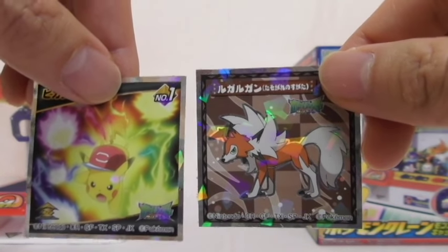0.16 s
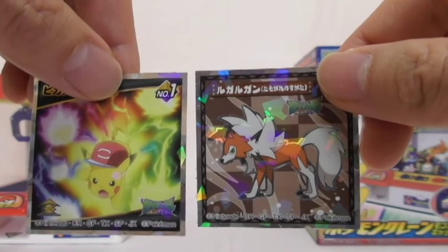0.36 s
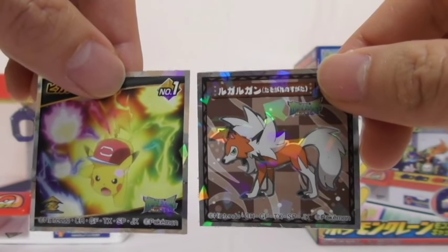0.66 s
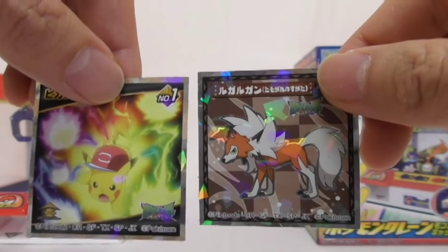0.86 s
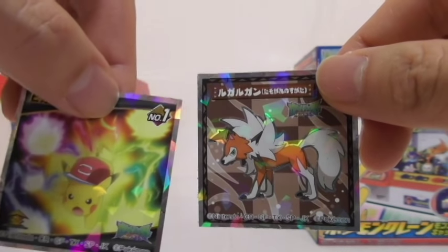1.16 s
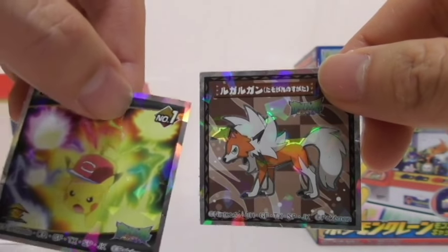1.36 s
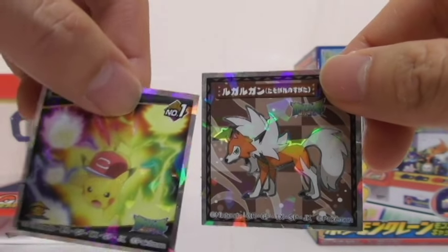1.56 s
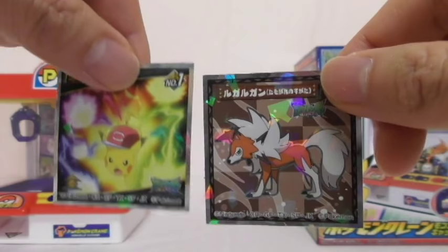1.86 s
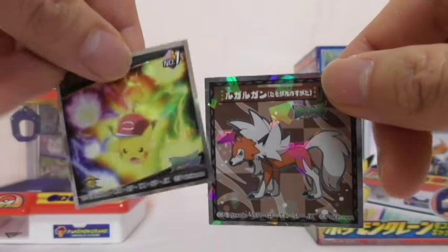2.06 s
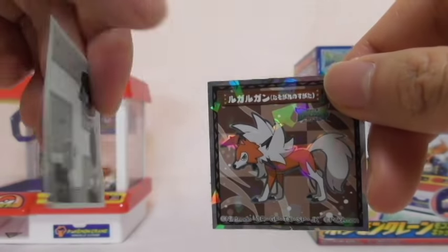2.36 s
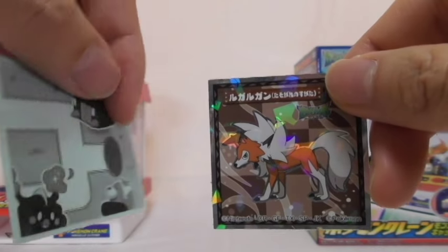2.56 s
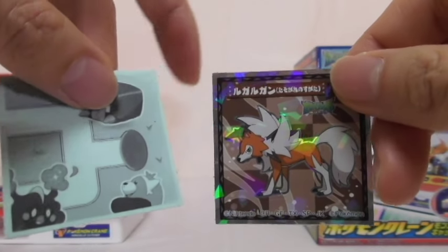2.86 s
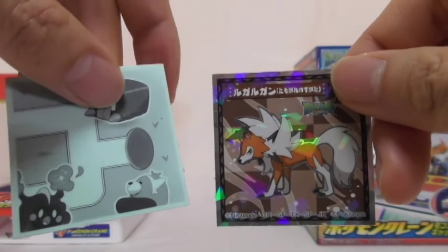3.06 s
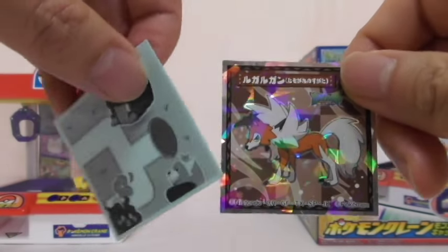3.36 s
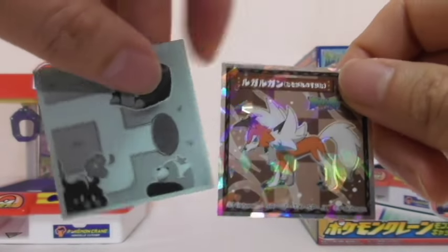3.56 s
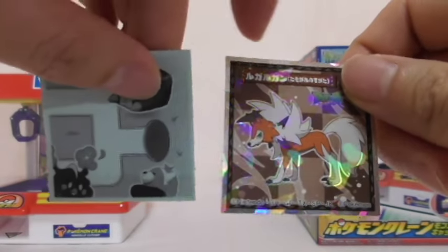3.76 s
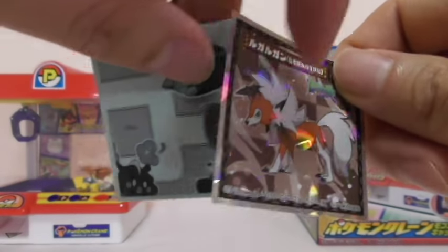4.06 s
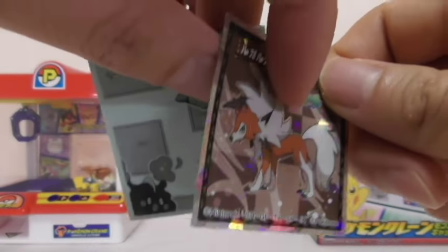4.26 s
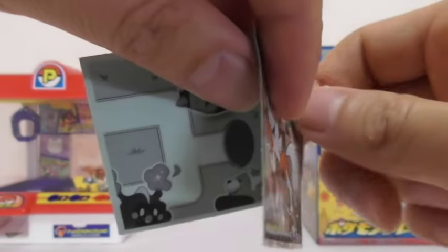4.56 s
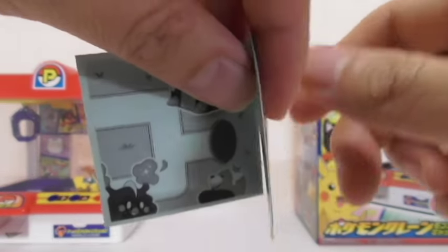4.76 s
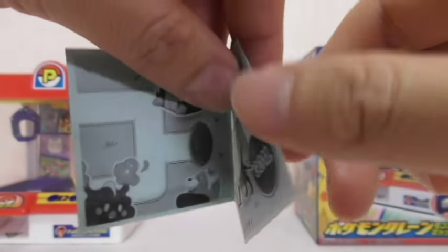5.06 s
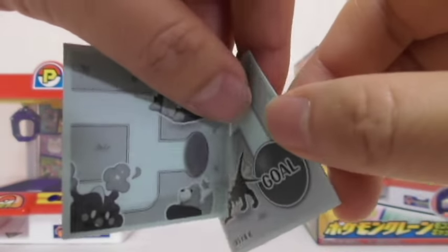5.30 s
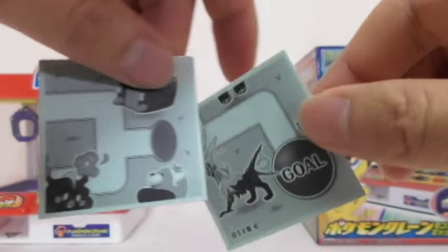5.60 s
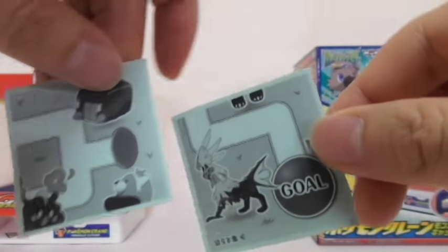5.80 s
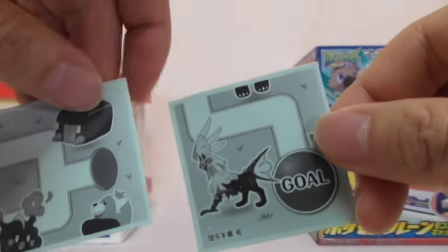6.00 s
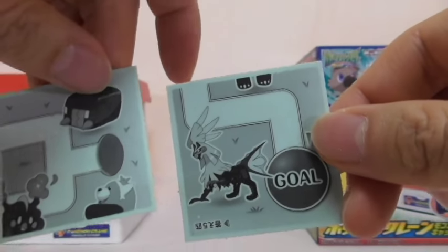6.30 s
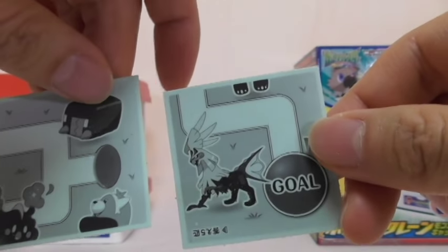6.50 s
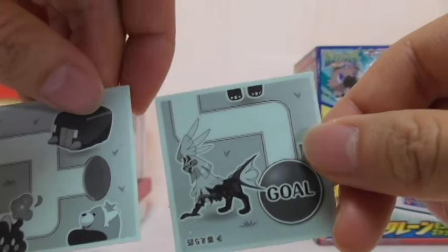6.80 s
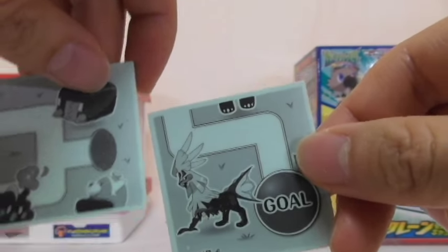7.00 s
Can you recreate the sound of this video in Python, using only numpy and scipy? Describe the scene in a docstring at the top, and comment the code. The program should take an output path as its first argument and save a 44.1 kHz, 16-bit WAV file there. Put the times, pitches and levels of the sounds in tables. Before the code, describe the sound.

In a quiet room, very close to a small stereo microphone, fingers handle two small stiff stickers. After over a second of near stillness, the first turns with short rubs, flicks and light thumps. The second follows with denser scraping and a loud crack around four seconds. Snaps thin out before six seconds, leaving faint hum, microphone hiss and the camera's tiny rapid focus ticking.

```python
"""Two stiff paper stickers are turned over between the fingers close to a small camera in a quiet room.
Skin slides on the paper in short hisses (dense clicks through a paper colour, with a ringing flutter),
edges flick free with snaps (short bursts of cracks), sheets buckle with low thumps (ringing modes).
The camera's focus drive ticks in spells (clicks ringing the lens barrel).
Low room noise and wavering hum tones lie under the hiss of the microphones (coloured noise)."""
import sys
import numpy as np
from scipy import signal
from scipy.fft import rfft, irfft
from scipy.io import wavfile

SR = 44100
rng = np.random.default_rng(int(sys.argv[2]) if len(sys.argv) > 2 else 0)


def digitize_waveform(pressure):
    """Quantize a signal to 16-bit integers and store it at the path in sys.argv[1].

    Rows of a 2-D input are taken as channels; values are limited to [-1, 1].
    """
    field = np.atleast_2d(pressure).T
    bounded = np.clip(field, -1, 1)
    quanta = np.round(bounded * 32767).astype(np.int16)
    wavfile.write(sys.argv[1], SR, quanta)


N = 314950


def from_db(db):
    """dB to gain."""
    return 10 ** (np.asarray(db) / 20)


def rms_one(x):
    """Scale to rms 1."""
    return x / np.sqrt(np.mean(x ** 2) + 1e-20)


def at_hz(points, hz):
    """Read a table on a log-frequency axis."""
    table_hz, values = np.array(points).T
    return np.interp(np.log(hz), np.log(table_hz), values)


def over_time(points, t_s):
    """Read a table on a time axis."""
    return np.interp(t_s, *np.transpose(points))


def drift(corner_hz):
    """Slow random curve of rms 1: noise through two equal poles, made at SR / 40."""
    r = np.exp(-2 * np.pi * corner_hz * 40 / SR)
    noise = rng.standard_normal(N // 40 + 2002)
    slow = signal.lfilter([1], [1, -2 * r, r * r], noise)[2000:]   # settled part
    return np.interp(np.arange(N) / 40, np.arange(len(slow)), rms_one(slow))


def ring(clicks, hz, t60_s):
    """Two-pole resonator: a unit click sets a sine of height 1 ringing."""
    r = from_db(-60 / (t60_s * SR))
    w = 2 * np.pi * hz / SR
    return signal.lfilter([0, np.sin(w)], [1, -2 * r * np.cos(w), r * r], clicks + 1e-18)


def pair(mid, side, likeness):
    """Left and right from a shared and an opposed part."""
    likeness = np.clip(likeness, -1, 1)
    return np.sqrt(1 + likeness) * mid + np.sqrt(1 - likeness) * side * [[1], [-1]]


# left-right likeness of steady noise: freq_hz, likeness [0-1]
NOISE_LIKENESS = [(60, 0.36), (450, 0.36), (1200, 0.69), (2000, 0.09), (3300, 1), (5500, 1), (9000, 0.68),
                  (15000, 0.17)]


def coloured(spectrum):
    """Steady stereo noise of rms 1, shaped by a spectrum table."""
    hz = np.maximum(np.fft.rfftfreq(N, 1 / SR), 1)
    mid, side = rfft(rng.standard_normal((2, N))) * from_db(at_hz(spectrum, hz))
    return rms_one(irfft(pair(mid, side, at_hz(NOISE_LIKENESS, hz)), N))


# microphone self-noise, relative density: freq_hz, density_db [dB per Hz]
MIC_HISS_SPECTRUM = [(1500, -9.5), (2100, -19.5), (2350, -28), (2800, -17.5), (4460, -15.5), (5000, -21.5),
                     (6500, -11), (7100, -10), (7700, -0.5), (8300, -5.5), (9470, -3.5), (11300, -5),
                     (14200, -4.5), (16000, -5)]
MIC_HISS_DB = -67.5


def mic_hiss():
    """Microphone self-noise: steady coloured noise."""
    return from_db(MIC_HISS_DB) * coloured(MIC_HISS_SPECTRUM)


# low room noise, relative density: freq_hz, density_db [dB per Hz]
AIR_SPECTRUM = [(15, -39), (25, -6.5), (45, -11.5), (65, -5), (130, -4), (230, -4), (366, -2), (490, -11.5),
                (720, -12.5), (1160, -21), (1450, -34.5), (1880, -70), (3190, -120)]
# mean level of the low room noise: time_s, level_db
AIR_LEVEL_DB = [(0, -57.5), (.7, -58), (1, -61), (2.998, -57.5), (7.14, -59)]


def air():
    """The room's low noise wanders in level, a little stronger on the right."""
    level_db = over_time(AIR_LEVEL_DB, np.arange(N) / SR) + 1.0 * drift(3.4)
    return from_db(level_db + [[-.6], [.6]]) * coloured(AIR_SPECTRUM)


# distant machines: pitch_hz, level_db, waver_hz
HUM_TONES = [(50, -76, 4), (98.5, -70, 3), (716, -73, 3), (840, -84, 2)]


def hum():
    """Steady tones whose level wavers; the left port leads by 0.8 rad."""
    t = np.arange(N) / SR
    lead_rad = np.array([[.4], [-.4]])
    out = np.zeros((2, N))
    for pitch_hz, level_db, waver_hz in HUM_TONES:
        gain = from_db(level_db + 3 + 1.8 * drift(waver_hz))   # +3: rms to sine height
        out += gain * np.sin(2 * np.pi * (pitch_hz * t + rng.random()) + lead_rad)
    return out


# spells in which the drive runs: start_s, end_s, level_db
FOCUS_RUNS = [(0, 0.728, 7.5), (2.23, 3.657, 6.5), (3.881, 7.14, 6)]
# contacts in each cycle: lag_s, level_db
FOCUS_CONTACTS = [(0, -77), (.0021, -76)]
# lens barrel resonances: pitch_hz, level_db, t60_s
BARREL_MODES = [(2780, 1, .0075), (3190, 0, .0075), (3730, -7, .006)]
FOCUS_HZ, FOCUS_FIRST_S = 59.94, .0102
WHIRR_DRIVE_RMS_DB = -107   # before the barrel and the spell level


def focus_drive():
    """Two small contacts each cycle ring the lens barrel; faint noise drives it as a whirr."""
    t = np.arange(N) / SR
    running = sum(from_db(db) * ((t >= start_s) & (t < end_s)) for start_s, end_s, db in FOCUS_RUNS)
    cycle_s = np.arange(FOCUS_FIRST_S, N / SR - .01, 1 / FOCUS_HZ)
    drive = from_db(WHIRR_DRIVE_RMS_DB) * rng.standard_normal(N)
    for lag_s, level_db in FOCUS_CONTACTS:
        strength = from_db(level_db + rng.normal(0, 1.6, len(cycle_s)))
        at = np.round((cycle_s + lag_s) * SR).astype(int)
        drive[at] += strength * rng.choice([-1, 1], len(cycle_s))
    out = np.zeros(N)
    for k, (pitch_hz, level_db, t60_s) in enumerate(BARREL_MODES):
        out += (-1) ** k * from_db(level_db) * ring(drive * running, pitch_hz, t60_s)
    return out


ROOM_T60_S = 0.032


def room(x):
    """Table and walls answer with a short diffuse tail of unit energy, other on each side."""
    t = np.arange(SR // 4) / SR
    tail = rng.standard_normal((2, len(t))) * from_db(-60 * t / ROOM_T60_S) * (t > .003)
    tail /= np.sqrt(np.sum(tail ** 2, axis=1, keepdims=True))
    return signal.oaconvolve(x[None], tail, axes=1)[:, :N]


RIGHT_SHEET_FROM_S = 3.5


def by_sheet(values, t_s):
    """The left sticker's value first, the right one's later."""
    return np.where(t_s < RIGHT_SHEET_FROM_S, *values)


# paper colour through the camera shell, relative: freq_hz, density_db [dB per Hz]
PAPER_COLOUR = [(1400, -18.5), (1900, -32.5), (2430, -34), (2900, -6), (4200, -10.5), (4900, -10.5),
                (6300, -7.5), (7400, 0.5), (8400, 0.5), (9300, -1.5), (10400, -4.5), (11800, -13),
                (13200, -21.5), (16000, -35.5)]


def paper_pulse(low_hz, high_hz, size=2048):
    """Causal (minimum-phase) pulse with the paper colour inside one band; unit energy."""
    hz = np.maximum(np.fft.rfftfreq(size, 1 / SR), 1)
    cepstrum = irfft(np.log(from_db(at_hz(PAPER_COLOUR, hz))))
    cepstrum[1:size // 2] *= 2   # fold to minimum phase
    cepstrum[size // 2 + 1:] = 0
    pulse = irfft(np.exp(rfft(cepstrum)))
    band = signal.butter(5, [low_hz, high_hz], "band", fs=SR, output="sos")
    pulse = signal.sosfilt(band, pulse)
    return pulse / np.sqrt(np.sum(pulse ** 2))


# buckles; the grip sets the pitch: time_s, level_db, pitch_hz (main mode), other_db (other parts)
BUCKLES = [(1.3512, -49, 303, -17), (1.421, -44, 206, -17), (1.7831, -35.5, 221, -2),
           (1.852, -44, 270, -22), (2.1558, -44.5, 232, -9), (2.3419, -41.5, 717, -26),
           (2.8776, -34.5, 554, -21), (2.886, -39, 406, 5.5), (3.2923, -54, 418, 10),
           (3.6248, -34.5, 175, 5.5), (3.9733, -34.5, 226, 0), (4.008, -36.5, 220, -5),
           (4.027, -35, 510, -25), (4.0617, -40, 416, 1), (4.0692, -40, 383, 1), (4.0891, -21.5, 299, 12.5),
           (4.1716, -33.5, 437, -13), (4.5096, -40.5, 630, -30), (4.6563, -34.5, 248, 1),
           (4.8474, -49, 212, 7.5), (5.1186, -49, 212, 8), (5.221, -45, 654, -15), (5.2525, -52, 263, 10.5),
           (5.3132, -47.5, 323, 4.5), (5.589, -29.5, 225, -4), (5.7456, -41, 192, -9.5),
           (5.849, -50.5, 220, 4.5), (6.0526, -48, 370, 4.5)]
# other parts, a low puff and two higher modes: pitch_ratio [x main], level_db, t60_share [x t60 of main]
OTHER_PARTS = [(.25, -25.5, 1.3), (2.302, 2.5, 0.18), (3.7, -1, 0.18)]
THUMP_T60_AT_300_HZ_S, THUMP_T60_POWER = 0.041, -0.019   # t60 goes with pitch to this power
THUMP_CONTACT_CYCLES = 0.05   # push decay, in cycles of the main mode
THUMP_PAN_DB = (3.5, -6)   # main mode, left minus right: left sticker, right sticker


def thumps():
    """A push rings the sheet's main mode, a low puff and two higher modes; all scale with its grip."""
    out = np.zeros((2, N))
    t = np.arange(6000) / SR
    for time_s, level_db, pitch_hz, other_db in BUCKLES:
        at = round(time_s * SR)
        t60_s = THUMP_T60_AT_300_HZ_S * (pitch_hz / 300) ** THUMP_T60_POWER
        pan_db = by_sheet(THUMP_PAN_DB, time_s)
        push = np.exp(-t * pitch_hz / THUMP_CONTACT_CYCLES)
        push /= push.sum()
        # the main mode is driven with less of the push's low end
        swing = signal.lfilter(*signal.butter(1, pitch_hz / 1.5, "high", fs=SR), push)
        main = ring(swing, pitch_hz, t60_s) * from_db([[pan_db / 2], [-pan_db / 2]])
        others = np.zeros(len(t))
        for ratio, part_db, t60_share in OTHER_PARTS:
            others += from_db(other_db + part_db) * ring(push, pitch_hz * ratio, t60_s * t60_share)
        out[:, at:at + 6000] -= from_db(level_db + 3) * (main + others)
    # the shell swallows the part above
    return signal.sosfilt(signal.butter(4, 1250, fs=SR, output="sos"), out)


# an edge flicks off a finger: time_s, level_db (peak of hiss band), rasp_db (re level_db)
FLICKS = [(0.9707, -47, -27), (1.7729, -31.5, -36), (1.7814, -28, -22), (2.2332, -47, -18),
          (2.5278, -46, -18), (2.5834, -38.5, -37), (2.8856, -33.5, -16), (3.3111, -34.5, -11),
          (3.3657, -36.5, -27), (3.3917, -33.5, -38), (3.4585, -41, -18), (3.4856, -43, -28),
          (3.9726, -51.5, -7), (4.0079, -42, -10.5), (4.0892, -2.5, -20.5), (4.3635, -50, -11),
          (4.4802, -47.5, -5), (4.509, -38.5, -7.5), (4.5323, -33, -30), (4.6516, -35.5, -5),
          (4.8457, -48.5, -3), (5.187, -46, -25), (5.2517, -39, -10.5), (5.3136, -38, -2.5),
          (5.3621, -28, -15.5), (5.415, -37, -1), (5.7447, -32, -8), (5.7548, -45, -16),
          (5.7746, -29.5, -20), (5.8099, -40.5, -12), (5.8495, -39, -12), (5.8565, -53, -5),
          (6.0508, -52, -8)]
# paper bands, in rows hiss, rasp, top: low_hz, high_hz
PAPER_BANDS_HZ = [(4900, 11300), (1500, 4900), (11300, 17000)]
SNAP_TOP_DB, SNAP_TOP_LIKENESS = -5.5, 0.299   # top band re hiss band
SNAP_DECAY_AT_MINUS_40_DB_S = 0.00031
SNAP_GROWTH_DB_PER_DB = 0.093   # decay time grows with strength
SNAP_RING_HZ, SNAP_RING_T60_S, SNAP_RING_DB = 8235, 0.0078, -18.5   # shell ring


def snaps():
    """Each flick is a burst of cracks decaying in under a millisecond, ringing in the shell."""
    out = np.zeros((2, N))
    t = np.arange(100) / SR
    pulses = [paper_pulse(*band)[:800] for band in PAPER_BANDS_HZ]
    click = np.eye(1, 800)[0]
    pulses[0] = pulses[0] + from_db(SNAP_RING_DB) * ring(click, SNAP_RING_HZ, SNAP_RING_T60_S)
    for time_s, level_db, rasp_db in FLICKS:
        at = round(time_s * SR)
        decay_s = SNAP_DECAY_AT_MINUS_40_DB_S * from_db(SNAP_GROWTH_DB_PER_DB * (level_db + 40))
        # one strong first crack, weaker ones after
        cracks = np.eye(1, 100) + .55 * rng.standard_normal((2, 100))
        mid, side = cracks * np.exp(-t / decay_s)
        bands = zip(pulses, (0, rasp_db, SNAP_TOP_DB), (1, 1, SNAP_TOP_LIKENESS))
        for pulse, part_db, likeness in bands:
            part = signal.convolve(pair(mid, side, likeness), pulse[None])
            part /= np.abs(part).max()
            out[:, at:at + part.shape[1]] += from_db(level_db + part_db) * part
    return out


# skin slides on paper: full_s (full strength from), rise_s, hold_s, fall_s,
# hiss_db, rasp_db (near 3 kHz, re hiss), flutter_db (re hiss)
SLIDES = [(1.355, 0.0037, 0.0027, .006, -64, -18, -8), (1.424, 0.0045, 0.0034, .006, -62.5, -18, -12),
          (1.761, 0.0049, 0.019, 0.016, -48, -18, -4.5), (2.09, 0.28, .003, 0.065, -64, -14, -12),
          (2.154, 0.012, 0.0033, 0.034, -58.5, -13, -14), (2.196, 0.02, 0.069, 0.1, -71, -11, -3.5),
          (2.343, 0.012, 0.0065, 0.0033, -37, -6, -11.5), (2.349, .005, .003, 0.078, -57, -3.5, -1),
          (2.492, .012, 0.14, 0.033, -70.5, -12, -6.5), (2.652, 0.019, .03, .012, -57, -14, -20),
          (2.77, 0.016, 0.1, 0.015, -53, -12, -12), (2.803, 0.023, 0.0051, 0.043, -43.5, -22, -35),
          (2.878, 0.033, .006, 0.011, -57, -7, 6.5), (3.214, 0.014, .003, 0.1, -58, -10.5, -10),
          (3.266, 0.039, 0.0088, 0.049, -52, -15, -14.5), (3.385, .07, 0.0033, 0.039, -57.5, -18, -8.5),
          (3.463, 0.043, .003, 0.027, -62, -13, -7.5), (3.516, 0.016, .003, .11, -65, -17, -33),
          (3.611, 0.033, .003, 0.017, -45.5, -10.5, -5), (4.019, 0.0074, .003, 0.033, -54.5, -10, -0.5),
          (4.059, 0.0043, .003, 0.027, -58, -9, 2), (4.096, 0.0074, 0.0019, 0.0068, -38.5, -13, 1.5),
          (4.106, .01, 0.035, 0.037, -56, -4, 6.5), (4.179, 0.018, 0.0066, 0.044, -43.5, -6, -8.5),
          (4.205, 0.018, .04, 0.049, -62, -14, -3), (4.299, 0.043, 0.032, 0.024, -47.5, -7, -4),
          (4.391, 0.021, 0.0032, 0.047, -46.5, -12, -8.5), (4.525, 0.047, .003, 0.034, -55.5, -7, -0.5),
          (4.568, 0.027, 0.0028, 0.052, -53, -8.5, -1), (4.651, 0.0062, 0.0053, 0.017, -51.5, -9, -4),
          (4.724, 0.015, 0.0027, 0.034, -61, -8.5, -3), (4.847, 0.017, .003, 0.04, -59.5, -12, -5),
          (5.01, 0.017, .003, 0.022, -62.5, -5, -16), (5.115, 0.013, 0.0024, 0.03, -49.5, -5.5, -2),
          (5.15, 0.016, 0.057, .06, -65.5, -9.5, 3.5), (5.224, 0.0085, 0.0019, 0.0068, -56.5, 0, 5),
          (5.251, .004, .003, 0.048, -65, -7, -4), (5.315, .008, 0.0027, 0.074, -63.5, -10, 3),
          (5.393, 0.016, 0.012, 0.011, -32.5, -12.5, -17), (5.453, 0.057, 0.0026, 0.022, -47.5, -7, -1.5),
          (5.484, 0.014, 0.0072, .02, -72.5, -15, 16), (5.533, 0.039, 0.046, .03, -49.5, -13, -20),
          (5.588, 0.015, 0.052, 0.027, -48.5, -6.5, -5), (5.658, 0.04, 0.019, 0.0044, -43, -15, -42),
          (5.682, .012, 0.055, .01, -67.5, -8, -5), (5.749, 0.0086, .003, 0.021, -64, -23, 13.5),
          (5.78, 0.0089, 0.0025, 0.0083, -54.5, -16, -3.5), (5.785, .006, 0.0037, 0.055, -59, -9, 4),
          (5.854, 0.0058, 0.0025, 0.021, -68, -22, 11.5), (5.873, 0.018, 0.025, 0.05, -80, -12, 14.5),
          (5.965, 0.01, 0.043, .03, -72.5, -10, 5), (6.945, .02, 0.011, 0.013, -63, -8.5, -9.5)]
# level above 11 kHz: time_s, level_db (re hiss)
TOP_LEVEL = [(1.76, -24), (2.1, -3), (2.8, -8), (3.3, -9), (3.61, -4.5), (4.1, -10), (4.7, -12), (5.4, -17),
             (5.6, -10), (7, -4)]
# pitch of the bent sheet: time_s, pitch_hz
FLUTTER_PITCH = [(1.76, 600), (2.8, 620), (2.88, 553), (3.6, 605), (4.02, 516), (4.13, 600), (4.199, 680),
                 (4.3, 820), (4.4, 670), (4.57, 740), (5.118, 606), (5.33, 545), (5.4, 716), (5.47, 507),
                 (5.62, 664), (5.8, 584)]
# edges of the drifting colour patches, rasp below 4900 Hz, hiss above: edge_hz
COLOUR_EDGES_HZ = [1500, 3400, 4900, 6600, 8000, 9500, 11300]
RAMP_DB = 20   # hiss climb per rise_s, drop per fall_s
FLUTTER_RISE_SHARE, FLUTTER_FALL_SHARE = 0.96, 0.83   # of the hiss's dB swing: flutter lingers
TOP_LIKENESS, FLUTTER_LIKENESS = 0.47, 0.87   # between the two microphone ports


def stroke_gains():
    """Gain curves of hiss, rasp, top and flutter; each slide rises, holds and falls in dB."""
    t = np.arange(N) / SR
    gains = np.zeros((4, N))
    for full_s, rise_s, hold_s, fall_s, hiss_db, rasp_db, flutter_db in SLIDES:
        on = slice(round((full_s - 4 * rise_s) * SR), round((full_s + hold_s + 4 * fall_s) * SR))
        before = (full_s - t[on]) / rise_s
        after = (t[on] - full_s - hold_s) / fall_s
        shape_db = -RAMP_DB * np.maximum(np.maximum(before, after), 0)
        parts_db = [[0], [rasp_db], [over_time(TOP_LEVEL, full_s)]]
        gains[:3, on] += from_db(hiss_db + shape_db + parts_db)
        share = np.where(t[on] < full_s, FLUTTER_RISE_SHARE, FLUTTER_FALL_SHARE)
        gains[3, on] += from_db(hiss_db + flutter_db + share * shape_db)
    return gains


def sheet_flutter(shaken):
    """Grains ring ten resonators, strongest near the pitch that the sheet's bend sets."""
    pitch_hz = over_time(FLUTTER_PITCH, np.arange(N) / SR)
    out = np.zeros((2, N))
    for hz in np.geomspace(180, 1250, num=10):
        near = np.exp(-(np.log(pitch_hz / hz) / .45) ** 2) + .18
        out += near * from_db(2.2 * drift(30)) * rms_one(ring(shaken, hz, 15.0 / hz))
    return out


def strokes():
    """Ridges of skin catch on fibres: dense clicks of uneven size, clumped in time."""
    gains = stroke_gains()
    sizes_db = 3.5 * np.minimum(rng.exponential(1, (2, N)), 3) + 1.8 * drift(150)
    catches = rng.random((2, N)) < 14000 / SR   # 14000 per s
    grains, other = rms_one(catches * from_db(sizes_db) * rng.choice([-1, 1], (2, N)))

    top_pulse = paper_pulse(*PAPER_BANDS_HZ[2])[None]
    top = pair(gains[2] * grains, gains[2] * other, TOP_LIKENESS)
    out = signal.oaconvolve(top, top_pulse, axes=1)[:, :N]

    for gain, band in zip(gains, PAPER_BANDS_HZ[:2]):
        rubbed = signal.oaconvolve(gain * grains, paper_pulse(*band))[:N]
        edges = [hz for hz in COLOUR_EDGES_HZ if band[0] <= hz <= band[1]]
        for patch in zip(edges, edges[1:]):   # the colour shifts as the contact moves over the sheet
            part = signal.sosfilt(signal.butter(1, patch, "band", fs=SR, output="sos"), rubbed)
            out += from_db(2.0 * drift(45) - 2.5) * part

    flutter = gains[3] * sheet_flutter(pair(grains, other, FLUTTER_LIKENESS))
    flutter = signal.sosfilt(signal.butter(2, 130, "high", fs=SR, output="sos"), flutter)
    return out + flutter / np.sqrt(3)


PAPER_PAN_DB = (1, -0.4)   # left minus right: left sticker, right sticker
ROOM_DB = -24.5


def scene():
    """Paper leans left, then right, with its room tail; drive, air, hum and hiss lie below."""
    paper = thumps() + snaps() + strokes()
    pan_db = by_sheet(PAPER_PAN_DB, np.arange(N) / SR)
    near = paper * from_db(pan_db * [[.5], [-.5]])
    near = near + from_db(ROOM_DB) * room(paper.mean(axis=0))
    return near + focus_drive() + air() + hum() + mic_hiss()


SHELL_NOTCH_HZ, SHELL_NOTCH_WIDTH_HZ = 1535, 520
CUTOFF_HZ = 15850


def record(dry):
    """The shell cancels a narrow band; the highest peaks are rounded; the top is cut steeply."""
    notch = signal.iirnotch(SHELL_NOTCH_HZ, SHELL_NOTCH_HZ / SHELL_NOTCH_WIDTH_HZ, fs=SR)
    notched = signal.lfilter(*notch, dry)
    rounded = notched / (1 + (np.abs(notched) / .76) ** 6) ** (1 / 6)
    return signal.sosfilt(signal.ellip(14, .5, 90, CUTOFF_HZ, fs=SR, output="sos"), rounded)


dry = scene()
out = record(dry)
digitize_waveform(out)
```